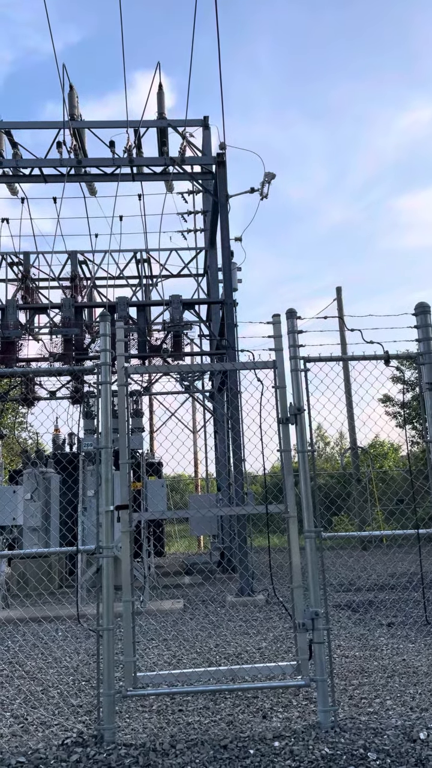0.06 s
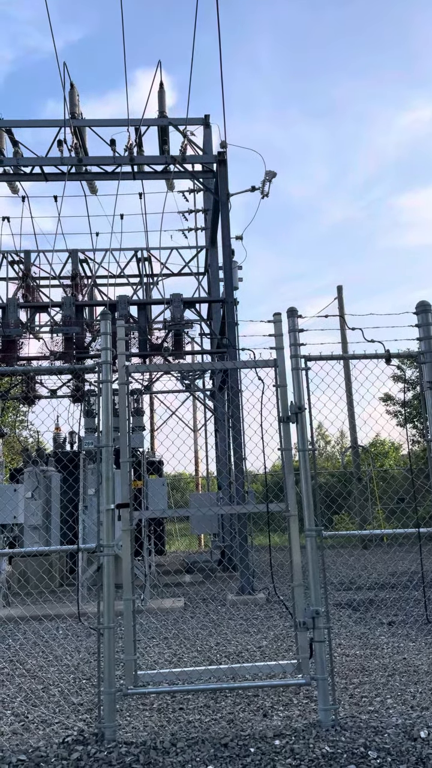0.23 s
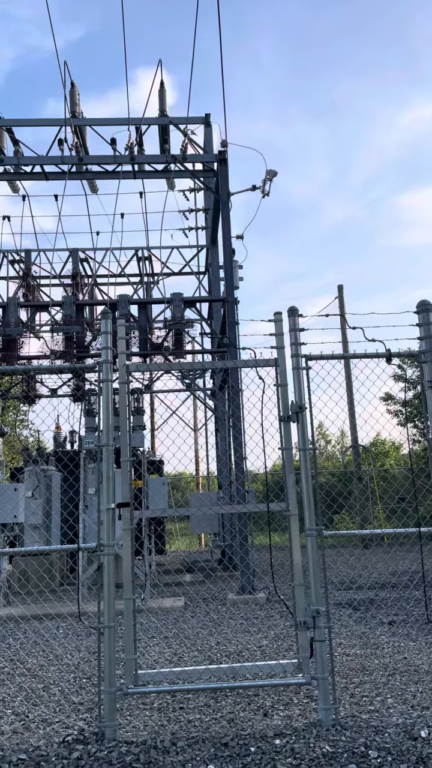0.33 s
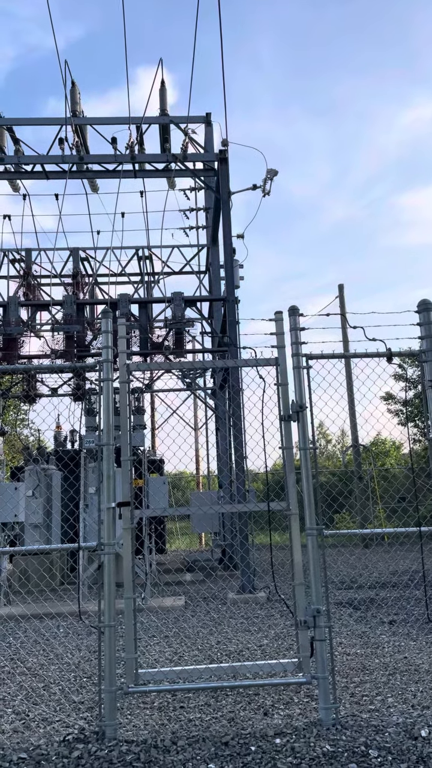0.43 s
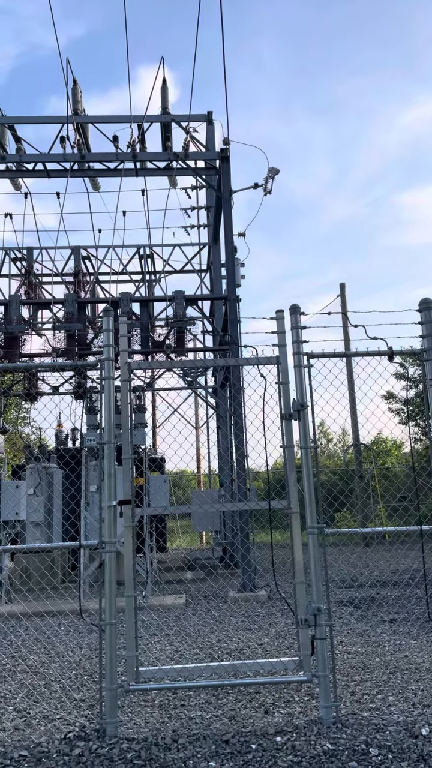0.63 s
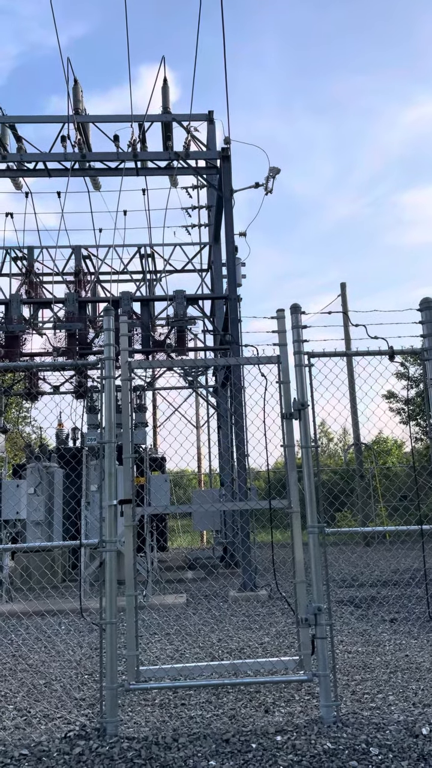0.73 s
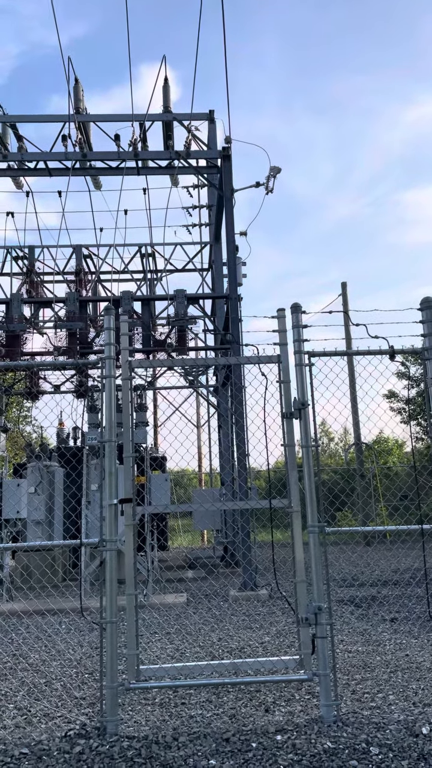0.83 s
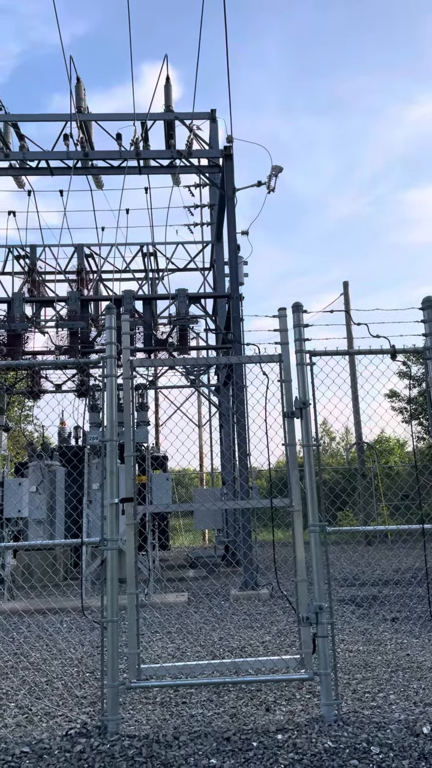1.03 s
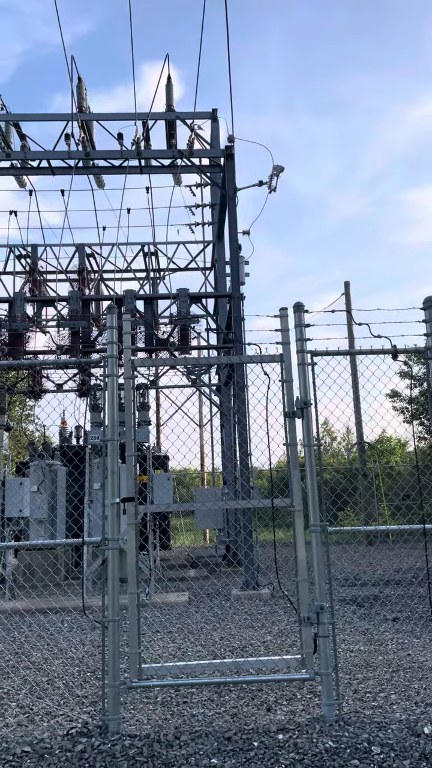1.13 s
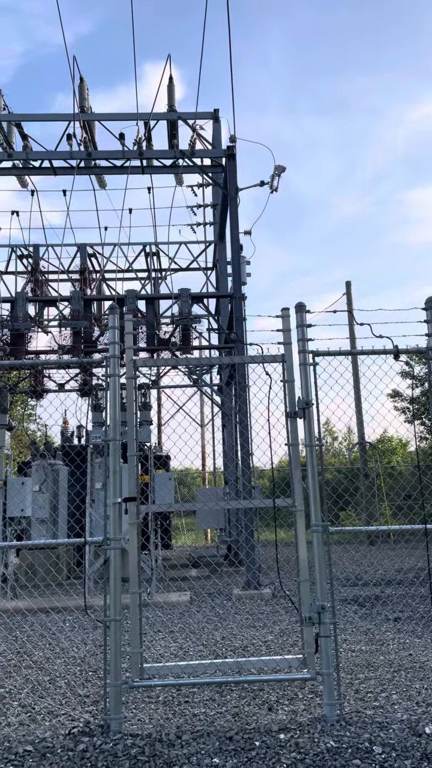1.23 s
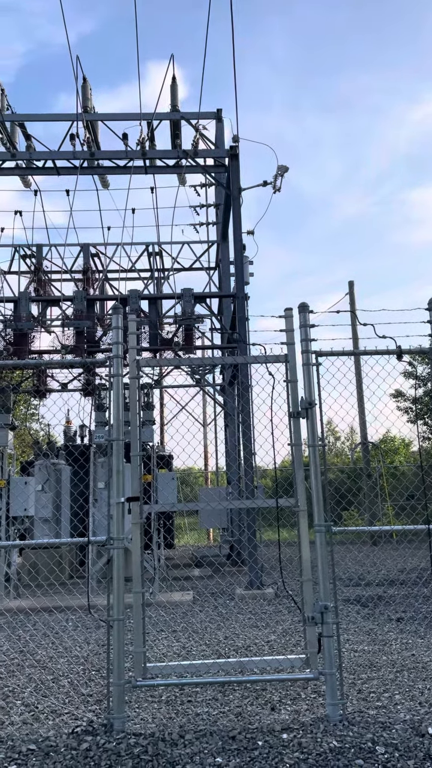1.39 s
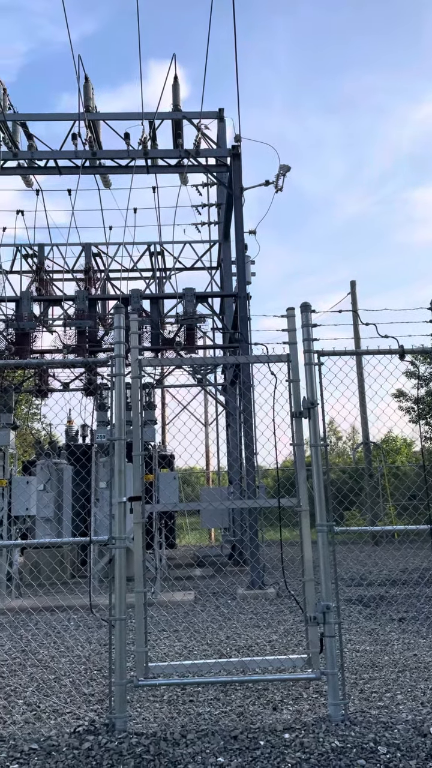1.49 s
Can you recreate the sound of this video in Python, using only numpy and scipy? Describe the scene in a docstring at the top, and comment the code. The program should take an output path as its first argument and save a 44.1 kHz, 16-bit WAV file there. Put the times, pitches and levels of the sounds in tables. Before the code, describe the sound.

A substation transformer hums steadily while wind gusts rumble and bump on the microphone.

```python
"""Transformer hum in gusting wind

Magnetostriction makes a substation transformer hum on multiples of twice the mains frequency,
over a faint outdoor hiss. Wind rumbles on the microphone and gusts in the second half: the air
flutters and rasps at its two ports, and single eddies bump them, each a quick pop that falls
in pitch to a low thud."""
import sys
import numpy as np
from scipy import signal
from scipy.fft import rfft, irfft
from scipy.io import wavfile
from scipy.ndimage import uniform_filter1d

SR = 44100
rng = np.random.default_rng(int(sys.argv[2]) if len(sys.argv) > 2 else 0)


def inscribe(sig):
    """Save sig as 16-bit PCM at rate SR to the path in sys.argv[1].

    A 1-D sig is mono; a 2-D sig holds one channel per row.
    Samples are clipped to [-1, 1] before scaling.
    """
    pcm = np.round(np.clip(np.atleast_2d(sig).T, -1, 1) * 32767)
    wavfile.write(sys.argv[1], SR, pcm.astype(np.int16))


N = 68355
T = np.arange(N) / SR
LEFT_RIGHT = np.array([[1], [-1]])


def amp(db):
    """Amplitude grows tenfold for every 20 dB."""
    return 10 ** (np.asarray(db) / 20)


def unit(x):
    """Normalisation to an rms of 1."""
    return x / np.sqrt(np.mean(x ** 2) + 1e-20)


def curve(points):
    """Linear interpolation between (seconds, value) points."""
    return np.interp(T, *np.transpose(points))


def drift(hz):
    """Low-passed noise wanders at rates up to about hz, with an rms near 1."""
    freqs = np.fft.rfftfreq(4 * N, 1 / SR)
    white = rfft(rng.standard_normal(4 * N))
    return unit(irfft(white * np.exp(-(freqs / hz) ** 2)))[:N]


def noise(spectrum, ports, tilt_db=0):
    """Partial coherence: the ports share part of a coloured noise, shifted in phase. The rms is 1."""
    octave = np.log2(np.fft.rfftfreq(N, 1 / SR) + 1)
    spectrum_hz, db = np.transpose(spectrum)
    port_hz, coherence, lead = np.transpose(ports)
    colour = amp(np.interp(octave, np.log2(spectrum_hz), db) + tilt_db * octave)
    left, independent = rfft(rng.standard_normal((2, N))) * colour
    shared = np.interp(octave, np.log2(port_hz), coherence)
    lag = np.interp(octave, np.log2(port_hz), lead)
    right = shared * left * np.exp(-1j * lag) + np.sqrt(1 - shared ** 2) * independent
    return unit(irfft(np.array([left, right]), N))


def steadied(x, span_s):
    """Division by the running rms evens out the chance swells of a noise."""
    power = uniform_filter1d((x ** 2).mean(0), int(span_s * SR))
    return x / np.sqrt(abs(power) + 1e-3)


# Spectrum of the outdoor hiss. Each row: frequency in Hz, relative spectral density in dB.
AIR_SPECTRUM = [(20, -23.5), (60, -7), (130, -6.5), (220, -5), (450, -13.5), (700, -19), (880, -18),
                (1150, -27), (1500, -33.5), (1950, -36), (2700, -28.5), (3600, -33.5), (5200, -35.5),
                (6400, -37), (7200, -64), (9500, -47.5), (13000, -64.5)]
# The hiss at the two ports. Each row: frequency in Hz, coherence from 0 to 1, left lead in radians.
AIR_COHERENCE = [(94, 1, 2.1), (415, 0.96, 2.7), (1030, .5, 2.72), (1380, 0.16, 0.55), (2140, .35, 1.2),
                 (2370, 0.54, 2.1), (3260, 0.82, 2.6), (4320, 0.34, 1.4), (5340, 0.79, 0.77),
                 (6660, 0.4, 3.8)]


def air(level_db=-52, left_excess_db=1.1):
    """Stationary broadband noise: the even hiss of open air and far trees."""
    return noise(AIR_SPECTRUM, AIR_COHERENCE) * amp(level_db + LEFT_RIGHT * left_excess_db / 2)


# Partials of the transformer tank. Each row: harmonic number, base level in dB, left minus right in dB.
HUM_PARTIALS = [(1, -52, 2.5), (2, -54, 2.5), (3, -62.5, -1), (4, -79.5, 7), (5, -69.5, 5), (6, -56.5, 2.5),
                (7, -74.5, -2), (8, -83, 13.5), (9, -77, 7.5), (10, -84, 4), (11, -97.5, -20),
                (12, -90, 20), (13, -88, 14), (14, -90.5, -1), (16, -100.5, -35.5), (18, -94, 23.5),
                (19, -107, 20), (20, -100, 31)]
# Change in the hum as the microphone drifts. Each row: time in seconds, gain in dB.
HUM_GAIN = [(0, -0.5), (.35, -1.5), (.62, -2.5), (.95, -0.5), (1.2, -1), (1.55, -3.5)]


def transformer(hum_hz=120.02, waver_db=.7, waver_hz=3.5):
    """Magnetostriction flexes the core twice a mains cycle; each harmonic wavers a little on its way."""
    out = np.zeros((2, N))
    for harmonic, db, left_excess_db in HUM_PARTIALS:
        tone = np.sqrt(2) * np.sin(2 * np.pi * (harmonic * hum_hz * T + rng.random()))
        level_db = db + curve(HUM_GAIN) + waver_db * drift(waver_hz)
        out += tone * amp(level_db + LEFT_RIGHT * left_excess_db / 2)
    return out


# Low mids of hum and air, which sink toward the end. Each row: time in seconds, gain in dB.
LOW_MID_GAIN = [(0, -1.5), (.15, 1.5), (.40, 3), (.52, -2.5), (.62, -4), (.85, -1), (1.55, -11.5)]


def sink_low_mids(x, low_hz=185, high_hz=655, edge_width_hz=80):
    """Time-varying equalisation: one band follows a gain curve while the rest passes unchanged."""
    hz = np.fft.rfftfreq(2 * N, 1 / SR)
    band = np.clip(np.minimum(hz - low_hz, high_hz - hz) / edge_width_hz + .5, 0, 1)
    low_mids = irfft(rfft(x, 2 * N) * band)[:, :N]
    return x + low_mids * (amp(curve(LOW_MID_GAIN)) - 1)


# All wind noise at the two ports. Each row: frequency in Hz, coherence from 0 to 1, left lead in radians.
WIND_COHERENCE = [(51.4, 0.94, 0.0029), (152, 0.77, 0.004), (396, 0.88, 0), (1010, .78, 0)]
# Spectrum of the rumble. Each row: frequency in Hz, relative spectral density in dB.
RUMBLE_SPECTRUM = [(15, -26.5), (28, -14), (45, 0.5), (62, 5.5), (100, 0.5), (140, -3.5), (200, -13.5),
                   (300, -21), (600, -88)]
# Swells of the rumble. Each row: time in seconds, relative level in dB.
RUMBLE_ENVELOPE = [(0, -40), (.04, -49), (.075, -44.5), (.13, -41.5), (.175, -55), (.21, -46.5),
                   (.25, -52.5), (.31, -51.5), (.39, -39.5), (.44, -48), (.49, -41.5), (.52, -37),
                   (.56, -33.5), (.60, -45.5), (.65, -43.5), (.70, -34), (.73, -45.5), (.765, -30),
                   (.79, -40), (.82, -40), (.86, -36.5), (.90, -50.5), (.945, -40.5), (.975, -27.5),
                   (1.005, -35), (1.035, -27), (1.05, -31), (1.07, -37.5), (1.10, -38.5), (1.13, -42.5),
                   (1.165, -35.5), (1.195, -34), (1.222, -46), (1.25, -32), (1.28, -40.5), (1.32, -35.5),
                   (1.355, -53.5), (1.38, -34.5), (1.41, -42.5), (1.46, -46.5), (1.51, -44), (1.55, -36.5)]


def rumble(gain_db=-0.5):
    """Low-frequency fluctuations of wind pressure reach both ports nearly alike."""
    pressure = steadied(noise(RUMBLE_SPECTRUM, WIND_COHERENCE), span_s=0.028)
    return pressure * amp(gain_db + curve(RUMBLE_ENVELOPE))


# Spectrum of the rasp. Each row: frequency in Hz, relative spectral density in dB.
RASP_SPECTRUM = [(600, -29.5), (1200, 4), (1500, -4), (2000, -6.5), (2800, -22), (5000, -51.5)]


def rasp(pressure, relative_db=-43):
    """Fine turbulence at the edges of the ports follows the running rms of the wind pressure."""
    envelope = np.sqrt(abs(uniform_filter1d((pressure ** 2).mean(0), size=130)))
    return amp(relative_db) * envelope * noise(RASP_SPECTRUM, WIND_COHERENCE)


# Gusts at the ports. Each row: start in seconds, time until decay in seconds, mean level in dB,
# spectral tilt in dB per octave.
GUST_EVENTS = [(0.192, 0.011, -44.5, -5.5), (0.558, 0.01, -62, 10.5), (0.726, 0.0094, -50, 8.5),
               (0.741, 0.022, -32, 3), (0.766, 0.021, -39, -0.5), (0.794, 0.029, -44.5, 1.5),
               (0.842, 0.019, -56, 4.5), (0.905, 0.013, -54, 5.5), (0.924, 0.022, -45, 2),
               (0.955, 0.014, -31, 4.5), (0.97, 0.017, -31, -3.5), (0.992, 0.019, -33, 2),
               (1.021, 0.017, -26.5, -1), (1.039, 0.013, -27, 4), (1.061, 0.014, -35.5, 1.5),
               (1.084, .016, -41.5, 3), (1.146, .006, -47, 8.5), (1.16, 0.02, -39, -1),
               (1.228, 0.021, -39, 0), (1.251, 0.025, -37.5, 4.5), (1.279, 0.02, -38.5, -5),
               (1.30, 0.021, -45, 4.5), (1.35, .018, -46, 3.5), (1.423, 0.035, -46, 3),
               (1.453, 0.04, -49, 6), (1.503, .01, -48, 10)]
# Spectrum of a gust before its tilt. Each row: frequency in Hz, relative spectral density in dB.
FLUTTER_SPECTRUM = [(30, -16.5), (70, -9.5), (170, 7), (350, 5), (470, -2), (570, -9), (780, -13.5),
                    (1030, -21), (1250, -38), (1800, -53), (3500, -91)]


def gusts(rise_s=0.0049, decay_s=0.0059, flutter_db=2, flutter_hz=100):
    """Turbulent flow at the ports: each burst rises fast, flutters and decays exponentially."""
    out = np.zeros((2, N))
    for start, length, db, tilt_db in GUST_EVENTS:
        rise = np.clip((T - start) / rise_s, 0, 1)
        decay = np.exp(-np.maximum(T - start - length, 0) / decay_s)
        turbulence = steadied(noise(FLUTTER_SPECTRUM, WIND_COHERENCE, tilt_db), span_s=0.0085)
        out += amp(db) * rise * decay * turbulence
    return out * amp(flutter_db * drift(flutter_hz))


# Eddies striking the ports. Each row: start in seconds, pop level in dB, starting pitch in Hz, time
# constant of the glide in seconds, thud level in dB, starting phase offset of each port in radians.
EDDY_EVENTS = [(0.187, -40.5, 430, 0.006, -34, .15), (0.379, -35.5, 134, 0.07, -50, .15),
               (0.663, -33, 240, 0.011, -42, .15), (0.742, -35, 1080, 0.0034, -37.5, .2),
               (.749, -22.5, 431, 0.0058, -29.5, .2), (.758, -34, 1228, 0.0026, -30.5, .2),
               (.772, -25, 527, 0.0039, -40, .2), (0.801, -39.5, 640, 0.0042, -44.5, .2),
               (.958, -26.5, 767, .006, -37.5, .6), (.965, -23, 414.5, 0.0063, -39, .35),
               (.994, -22.5, 770, 0.0087, -36, 1.3), (.998, -25, 390, 0.042, -47, .8),
               (1.027, -21, 622, .005, -28, .25), (1.037, -24, 770, 0.00695, -39, .2),
               (1.043, -22, 630, .006, -33, .2), (1.049, -28, 1157, 0.00472, -37, .2),
               (1.052, -30, 526, 0.00492, -30, .2), (1.088, -33, 770, 0.0033, -45, .2),
               (1.144, -35, 770, 0.0063, -40, .15), (1.181, -36.5, 741, .004, -36, .15),
               (1.231, -32, 823, .006, -40.5, .15), (1.252, -32, 900, 0.0021, -39, .15),
               (1.273, -37.5, 840, 0.0054, -37, .15), (1.290, -35, 850, .006, -35.5, .15),
               (1.349, -36.5, 800, .0035, -38, .2), (1.420, -36.5, 706, .005, -41.5, .2),
               (1.436, -39, 540, 0.0059, -54, .2), (1.474, -39.5, 928, .005, -44.5, .2),
               (1.510, -35.5, 672, 0.036, -62, .2)]


def eddies(pop_cycles=1.76, thud_hz=60.8, thud_peak_s=0.021, jitter=.25, jitter_hz=600, port_hz=1150):
    """A falling chirp: an eddy swings the pressure ever more slowly, out of step at the two ports."""
    out = np.zeros((2, N))
    t = np.arange(SR // 10) / SR
    for start, pop_db, top_hz, glide_s, thud_db, port_offset in EDDY_EVENTS:
        start_cycle, side = rng.random(2)
        glide_hz = thud_hz + (top_hz - thud_hz) * np.exp(-t / glide_s)
        quickness = np.sqrt(glide_hz / top_hz)  # jitter and skew shrink as the pitch falls
        wobble = np.exp(jitter * drift(jitter_hz)[:len(t)] * quickness)
        uneven_hz = np.minimum(glide_hz * wobble, top_hz)
        phase = 2 * np.pi * (np.cumsum(uneven_hz) / SR + start_cycle)
        skew = port_offset * np.sign(side - .5) * quickness * LEFT_RIGHT
        pop_age, thud_age = t * top_hz / pop_cycles, t / thud_peak_s  # each envelope peaks at age 1
        pop = amp(pop_db) * pop_age * np.exp(1 - pop_age)
        thud = amp(thud_db) * (thud_age * np.exp(1 - thud_age)) ** 3
        add(out, start, (pop + thud) * np.sin(phase + skew))
    return signal.sosfilt(signal.butter(4, port_hz, "low", fs=SR, output="sos"), out)


def scene():
    """Superposition of the steady air and hum with the wind on the microphone."""
    buffets = gusts() + eddies()
    return sink_low_mids(transformer() + air()) + rumble() + buffets + rasp(buffets)


def record(dry, low_cut_hz=36.4, band_limit_hz=12500):
    """The microphone acts as a band-pass filter: a low cut, then a steep treble limit."""
    high_passed = signal.sosfilt(signal.butter(3, low_cut_hz, "high", fs=SR, output="sos"), dry)
    low_pass = signal.firwin(511, band_limit_hz, window=("kaiser", 9), fs=SR)
    return signal.oaconvolve(high_passed, low_pass[None], "same")


def add(mix, start_s, sound):
    """Superposition of a stereo sound on the mix from a given time."""
    part = mix[:, round(start_s * SR):][:, :sound.shape[1]]
    part += sound[:, :part.shape[1]]


dry = scene()
out = record(dry)
inscribe(out)
```